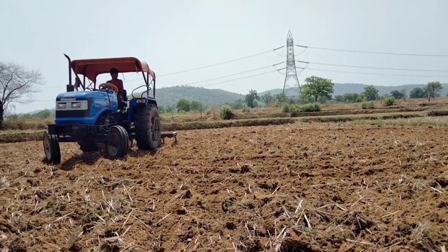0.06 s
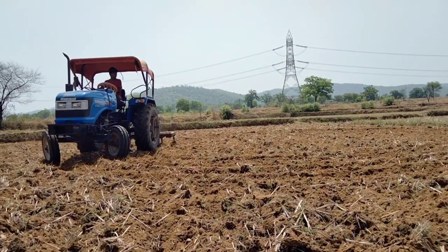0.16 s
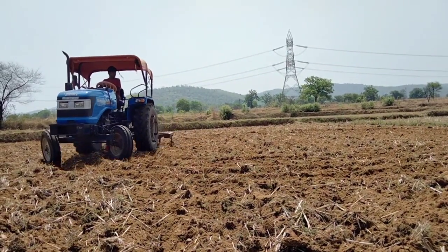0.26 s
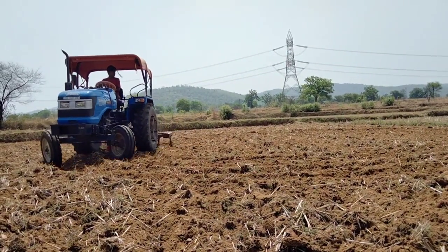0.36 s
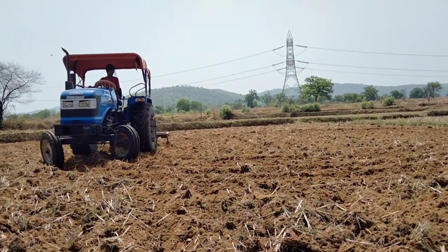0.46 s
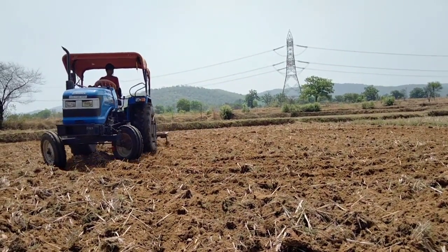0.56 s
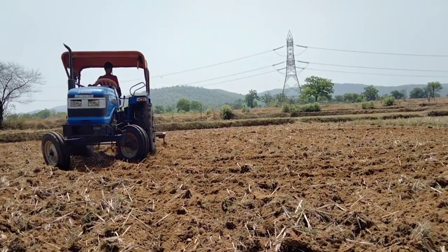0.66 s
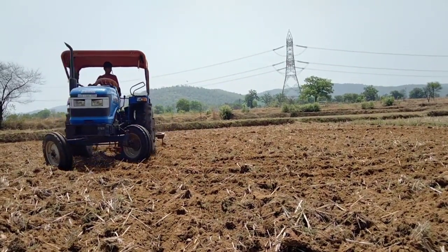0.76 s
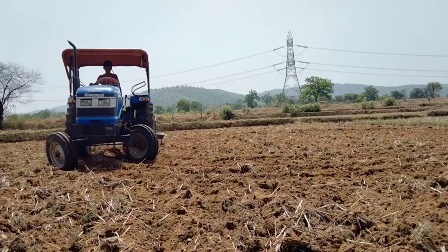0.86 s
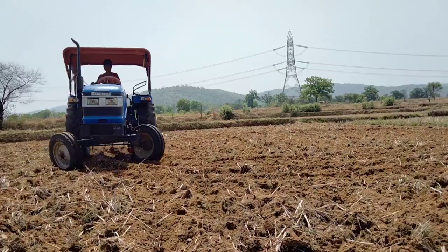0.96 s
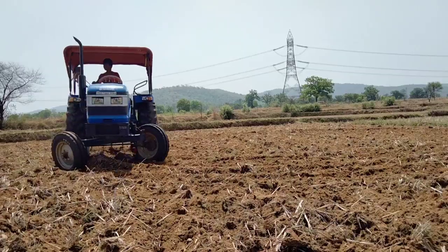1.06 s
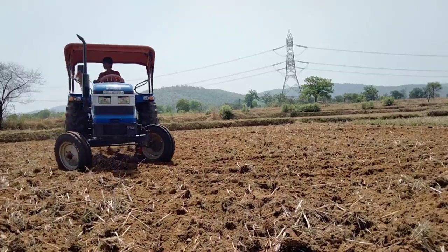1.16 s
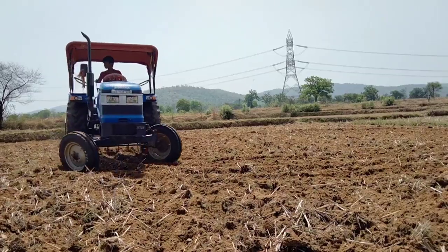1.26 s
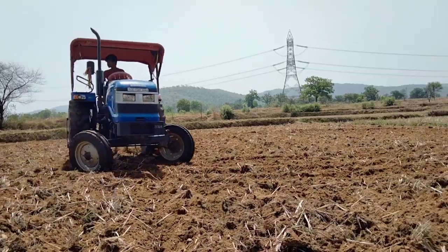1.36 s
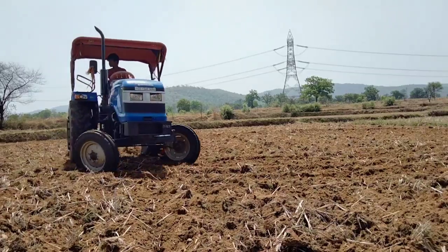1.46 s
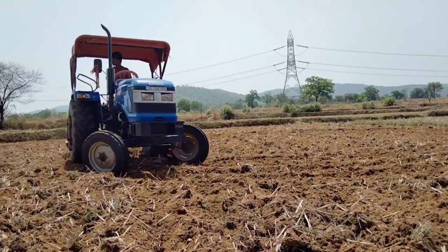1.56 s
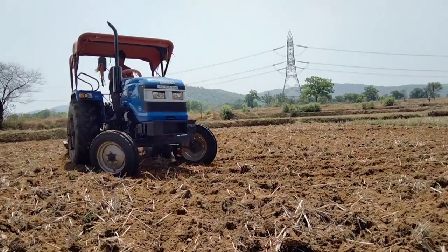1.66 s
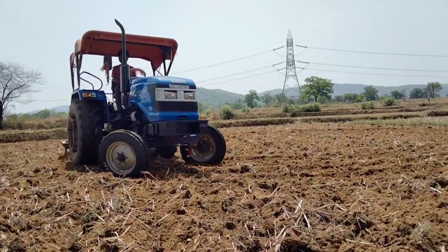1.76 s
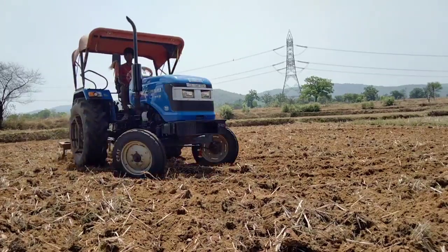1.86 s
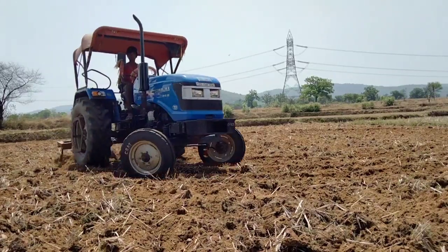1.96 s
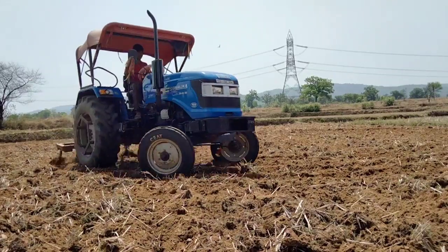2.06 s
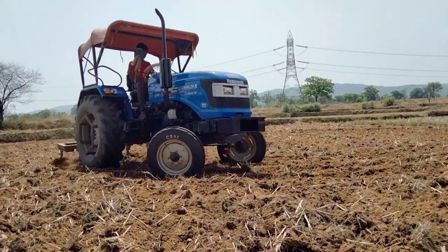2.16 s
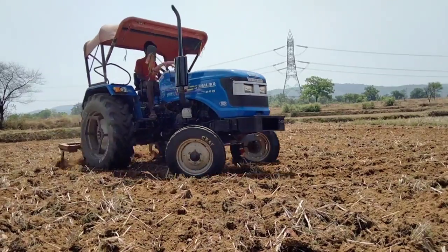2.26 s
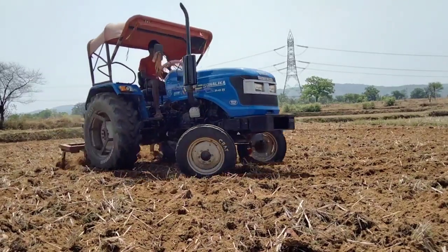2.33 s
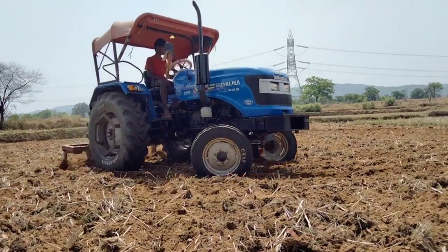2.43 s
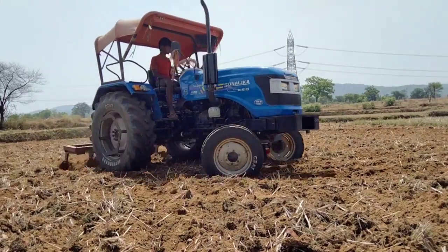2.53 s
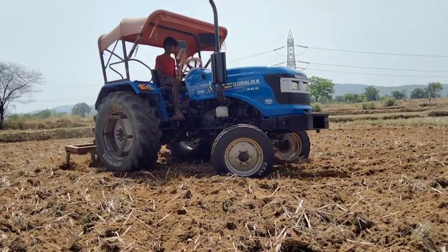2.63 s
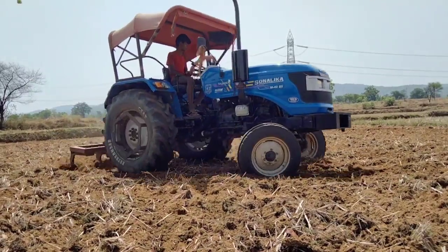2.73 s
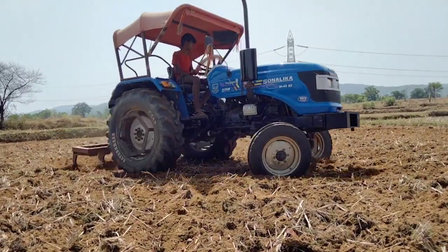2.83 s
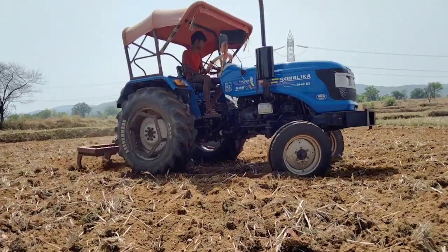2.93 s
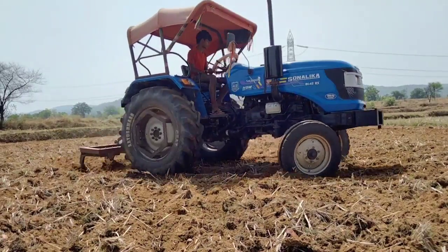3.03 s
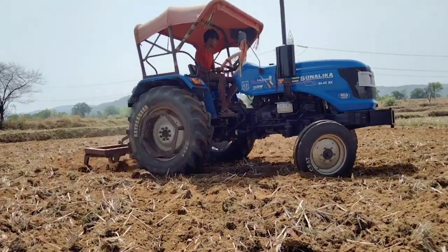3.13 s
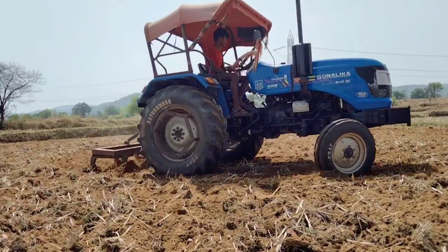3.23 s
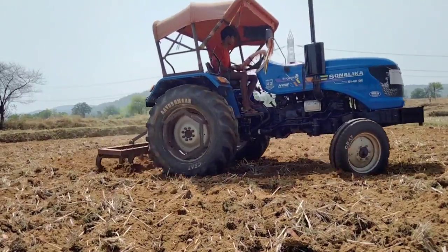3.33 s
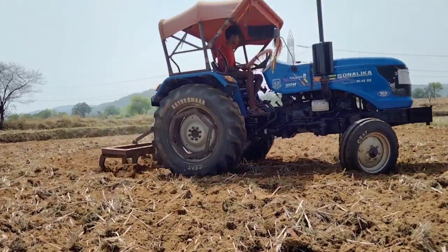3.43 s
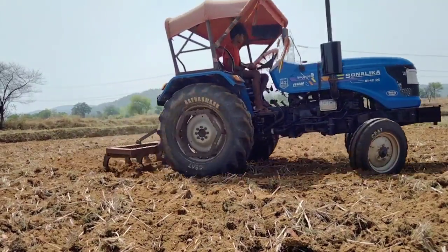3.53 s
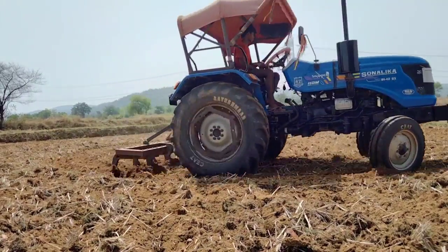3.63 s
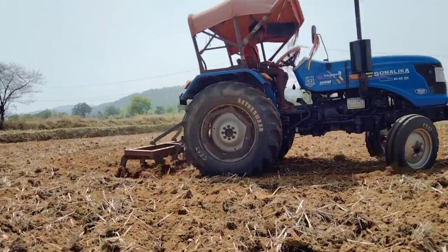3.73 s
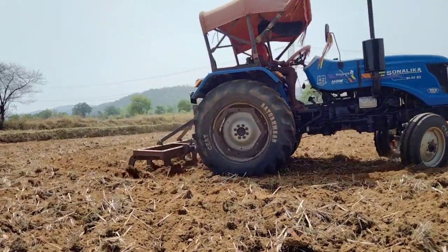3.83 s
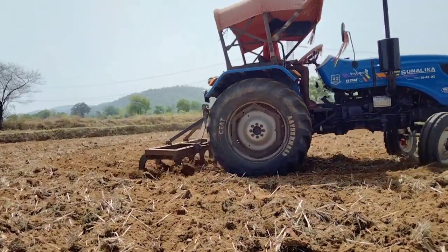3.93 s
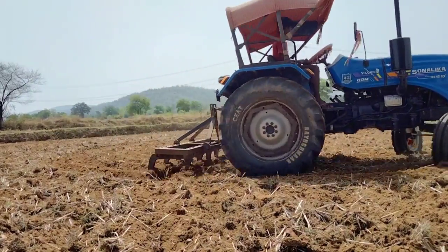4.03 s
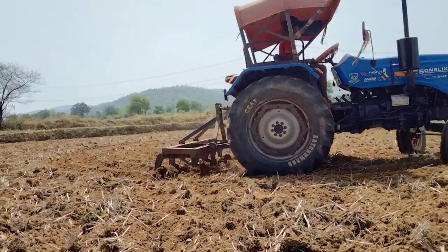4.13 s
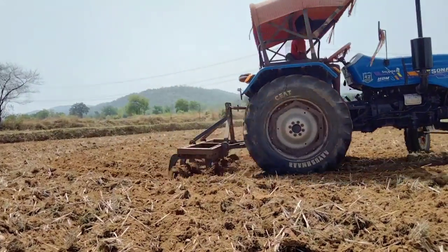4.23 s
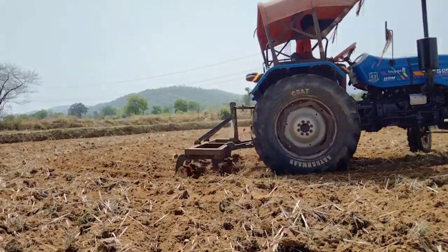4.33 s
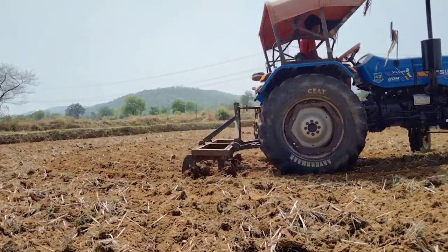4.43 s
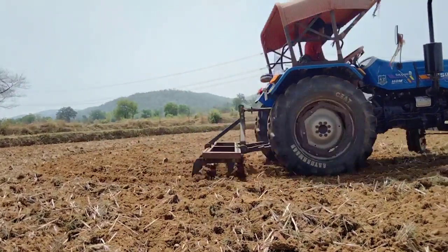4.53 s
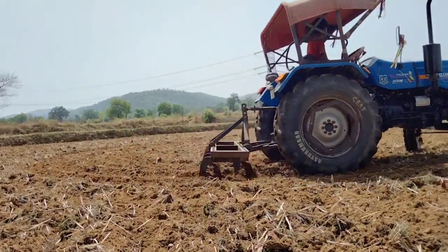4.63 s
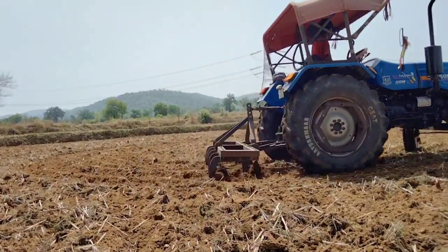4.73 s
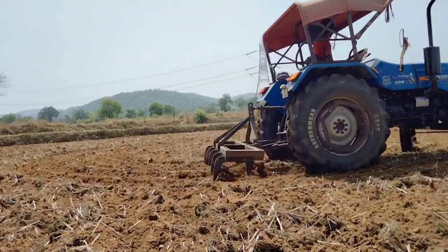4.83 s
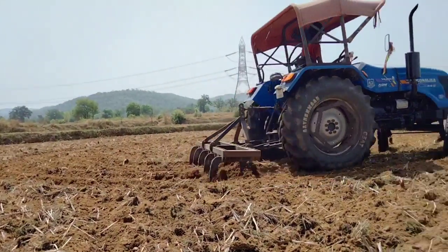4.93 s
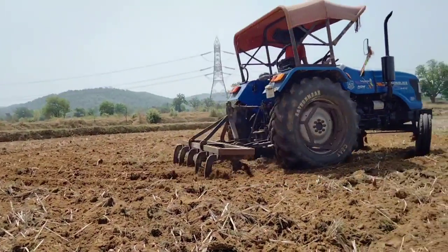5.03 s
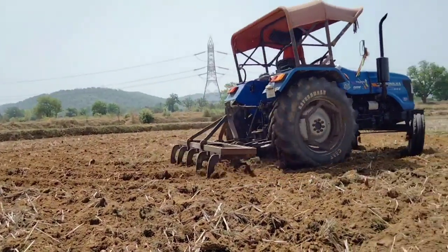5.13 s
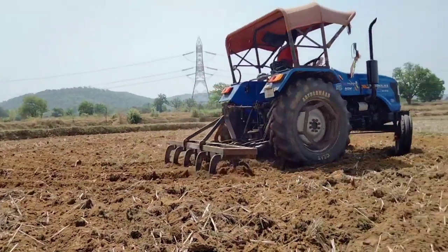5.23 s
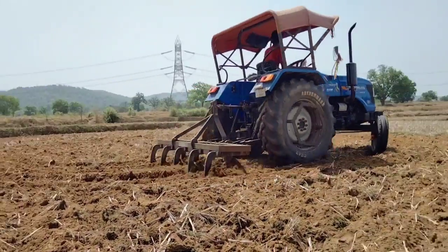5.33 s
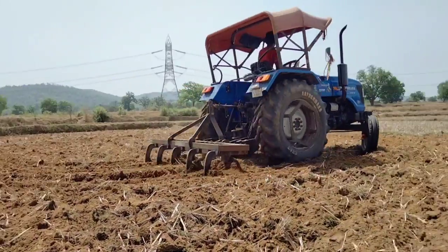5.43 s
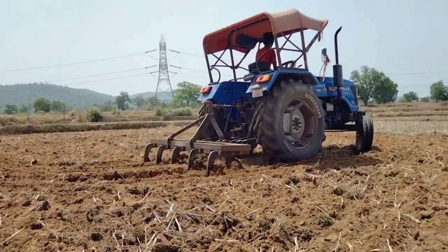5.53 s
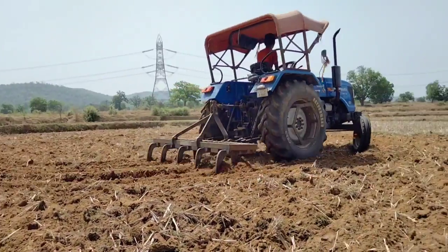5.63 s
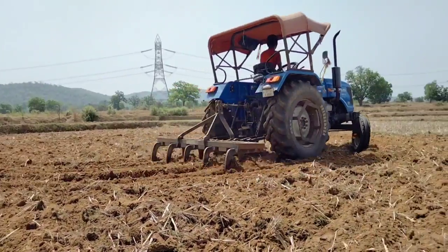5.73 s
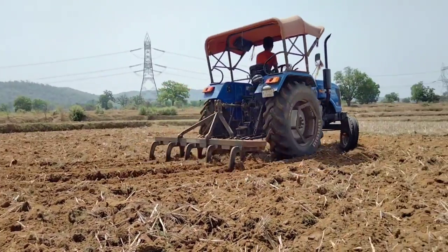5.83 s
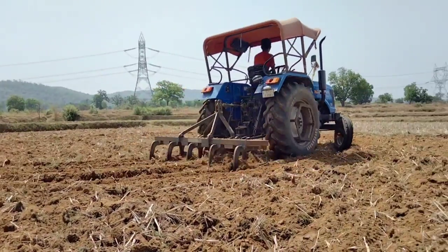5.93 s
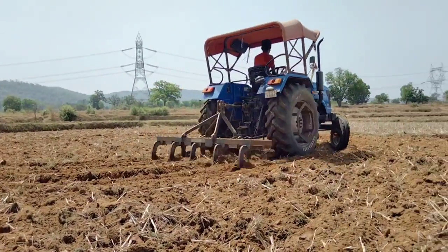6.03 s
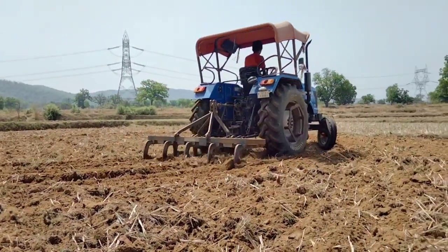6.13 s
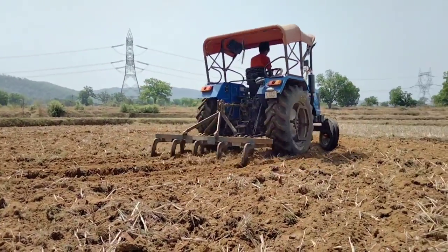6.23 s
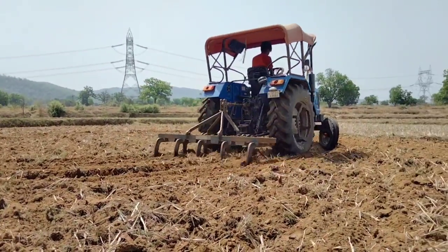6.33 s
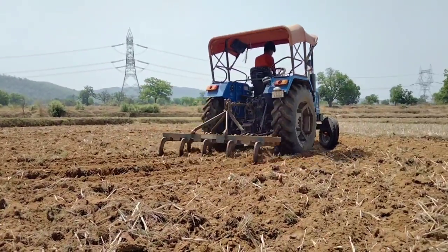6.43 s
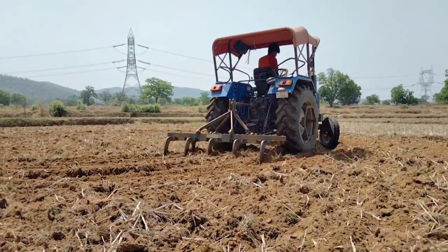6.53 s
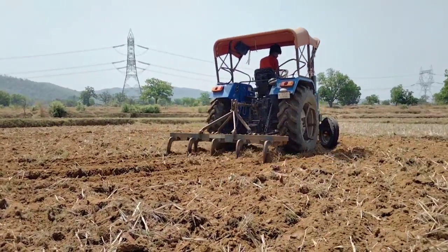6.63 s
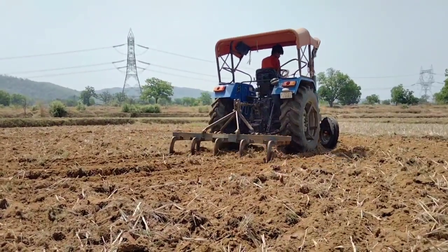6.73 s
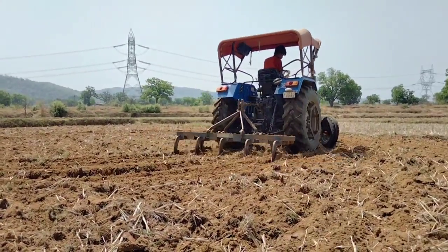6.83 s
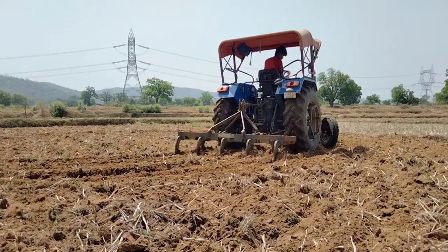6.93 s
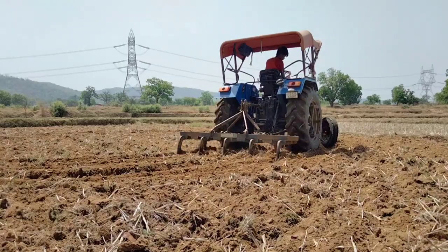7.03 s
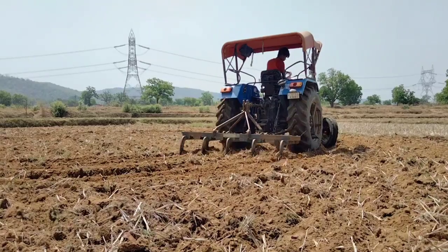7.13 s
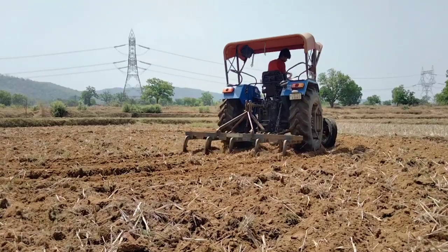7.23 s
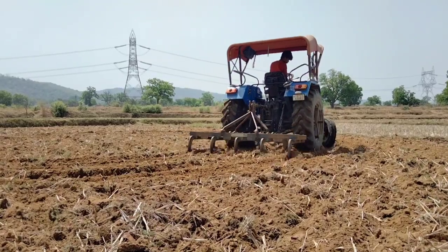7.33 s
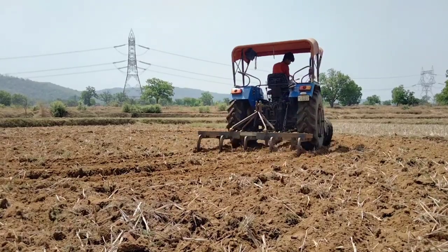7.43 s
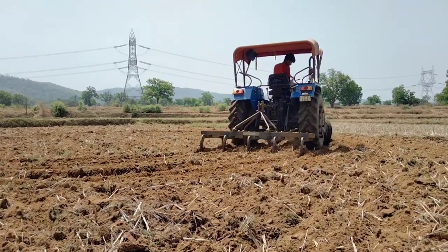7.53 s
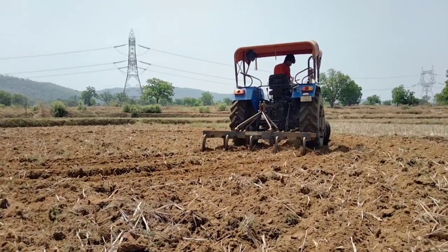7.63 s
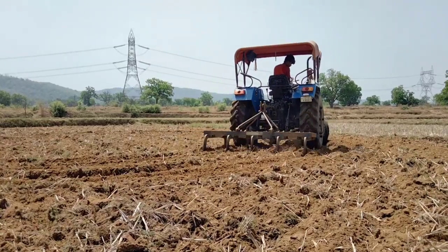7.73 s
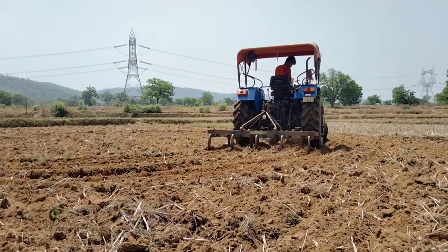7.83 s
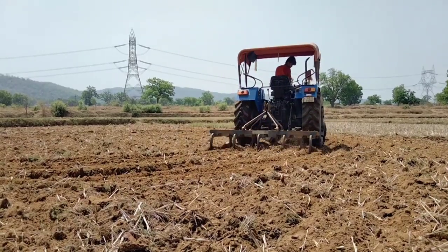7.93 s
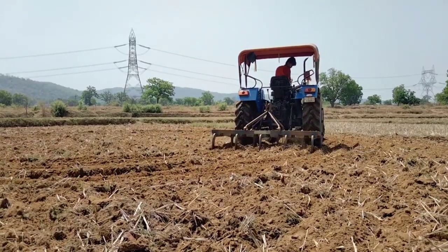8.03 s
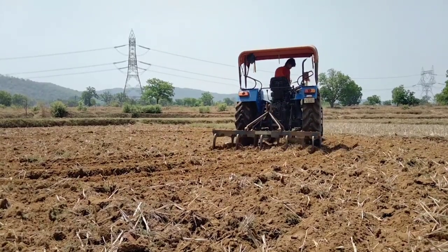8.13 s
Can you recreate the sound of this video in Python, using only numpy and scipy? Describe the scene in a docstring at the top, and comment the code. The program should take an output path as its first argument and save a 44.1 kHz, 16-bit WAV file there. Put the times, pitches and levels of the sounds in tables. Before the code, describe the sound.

Loaded three-cylinder tractor engine chugs at a constant fast pace, swelling with bright metallic knocking and hissing exhaust, then fading away behind.

```python
"""A three-cylinder diesel tractor turns toward the listener in a dry field, passes close and drives off.
Its exhaust thump is a sum of multiples of the firing rate; gas hisses from the pipe mouth as shaped noise.
Each firing rings modes of the engine block; the body roars as coloured noise, booming in panels and hollows.
Fan, pump and gears whine at whole multiples of the engine cycle, and tines of the dragged cultivator
strike three stones as decaying modes, all over a steady hiss."""
import sys
import numpy as np
from scipy import signal
from scipy.fft import rfft, irfft, next_fast_len
from scipy.io import wavfile
from scipy.ndimage import uniform_filter1d, map_coordinates

SR = 44100
rng = np.random.default_rng(int(sys.argv[2]) if len(sys.argv) > 2 else 0)


def persist_wave(psi):
    """Save psi, clipped to +-1, as 16-bit WAV."""
    counts = np.round(np.clip(psi, -1, 1) * 32767).astype(np.int16)
    wavfile.write(sys.argv[1], SR, np.atleast_2d(counts).T)


N = 360738


def amp(db):
    """Logarithmic level: decibels to amplitude gain."""
    return 10 ** (np.asarray(db) / 20)


def unit(x):
    """Normalisation to an rms of 1."""
    return x / np.sqrt(np.mean(x ** 2) + 1e-20)


def curves(rows):
    """Linear interpolation: one value per sample for each column after the time."""
    times, *columns = np.transpose(rows)
    t = np.arange(N) / SR
    return [np.interp(t, times, column) for column in columns]


def filtered(x, response):
    """Linear filtering: the spectrum of x times a response of frequency."""
    m = next_fast_len(N + SR // 2)
    return irfft(rfft(x, m) * response(np.fft.rfftfreq(m, 1 / SR)), m)[:N]


def resonance(f, centre, width):
    """Resonance curve with a peak of 1; the width is taken at half height."""
    return 1 / (1 + (2 * (f - centre) / width) ** 2)


def drift(step_s):
    """Slow random fluctuation: a smooth spline through a new value every step."""
    t = np.arange(N // 64 + 1) * 64 / SR
    knots = rng.standard_normal(int(N / SR / .04) + 4)
    return np.repeat(map_coordinates(knots, [t / max(step_s, .04)]), 64)[:N]


def wander(depth_db):
    """Amplitude modulation by a slow random gain, with a new value every 0.3 s."""
    return amp(depth_db * drift(.3))


# Firing rate of the engine: (time [s], rate [firings/s])
FIRING_RATE = [(0, 36.488), (1.3, 36.374), (2.1, 35.989), (3.5, 35.968), (5.2, 35.904), (8.18, 35.575)]


def firings():
    """Phase is the integral of rate: the count is whole where the exhaust valve opens."""
    return np.cumsum(curves(FIRING_RATE)[0]) / SR + .73


# Side of the tractor that is heard: (time [s], view [0 front, 1 side, 2 rear])
VIEW_IN_TIME = [(0, 0), (.9, 0.12), (1.6, .85), (2.5, 1.06), (3.4, 1.44), (4.3, 1.44), (5.2, 1.773),
                (6.5, 1.97), (8.18, 2.31)]


def view_now():
    """Directivity depends on angle: the view of the tractor at each sample."""
    return curves(VIEW_IN_TIME)[0]


def seen(rows):
    """Directivity: one value per sample for each column after the view, as the tractor turns."""
    views, *columns = np.transpose(rows)
    now = view_now()
    return [np.interp(now, views, column) for column in columns]


# Base levels through the pass: (time [s], exhaust thump [dB], body roar [dB], block knock [dB],
# exhaust jet [dB], crack at the start of each puff [dB])
PASS_LEVELS = [(0, -23.5, -31, -44, -33.5, -43), (.3, -23.5, -30, -39, -30.5, -42),
               (.55, -22, -29, -36.5, -28.5, -44), (.72, -23, -29, -36, -31.5, -45),
               (.9, -21, -28.5, -32.5, -29.5, -39), (1.03, -24, -28.5, -38, -33, -46),
               (1.2, -21.5, -28, -31, -28, -35), (1.6, -22, -27.5, -33, -26.5, -39),
               (1.8, -21.5, -26.5, -31.5, -25, -35), (2.2, -22, -26.5, -30.5, -26, -38),
               (2.55, -22, -27, -30, -25.5, -39), (2.72, -24, -26.5, -31.5, -27, -40),
               (3.15, -23.5, -29, -36, -25.5, -40), (3.6, -26, -29, -35, -27.5, -37),
               (3.75, -27.5, -30, -38.5, -31.5, -43), (3.97, -26.5, -31.5, -37, -26.5, -36),
               (4.15, -31, -32.5, -37.5, -33, -43), (4.35, -27.5, -32, -43, -30, -39),
               (4.52, -27.5, -34.5, -41.5, -32, -49), (4.7, -27.5, -33.5, -41, -32.5, -44),
               (5.05, -29.5, -33, -43, -36.5, -49), (5.25, -29, -34, -45.5, -38, -45),
               (5.7, -29.5, -35.5, -45.5, -40.5, -53), (6.5, -29.5, -37, -57, -43, -55),
               (7.2, -31.5, -38.5, -55, -45.5, -56), (8.18, -31.5, -39.5, -57, -44, -54)]


def pass_gains():
    """Level against time in the pass: gains of thump, roar, knock, jet and crack."""
    return amp(curves(PASS_LEVELS))


def sizes(scatter_db):
    """Cycle-to-cycle variation: a random gain held through each firing."""
    count = firings().astype(int)
    return amp(scatter_db * rng.standard_normal(count[-1] + 1))[count]


def puff(rise, hold, fall, rest_db):
    """Exponential rise and decay once a firing (times as shares of it), on a constant rest level."""
    u = firings() % 1
    attack = 1 - np.exp(-u / rise)
    decay = np.exp(-np.maximum(u - hold, 0) / fall)
    return attack * decay + amp(rest_db)


def rush(spectrum, patchy_db, repeat=0, patch=(4, 16)):
    """Broadband noise of rms 1, coloured and patchy (bins by frames); a share repeats every engine cycle."""
    f, db = np.transpose([(1, -120)] + list(spectrum) + [(SR / 2, -120)])
    cycle = rng.standard_normal(SR // 12)
    repeated = cycle[(firings() / 3 % 1 * len(cycle)).astype(int)]
    share = np.clip(repeat, 0, 1)
    source = np.sqrt(1 - share) * rng.standard_normal(N) + np.sqrt(share) * repeated
    z = signal.stft(source, nperseg=1024)[2]
    field = uniform_filter1d(rng.standard_normal(z.shape), size=patch[0], axis=0)
    field = uniform_filter1d(field, size=patch[1], axis=1)
    noise = signal.istft(z * amp(patchy_db * unit(field)), nperseg=1024)[1][:N]
    return unit(filtered(noise, lambda hz: amp(np.interp(np.log(hz + 1), np.log(f + 1), db))))


def strike(times, levels_db, modes, spread, rough, scatter_db, snap_db):
    """Modal impact: each blow snaps and rings modes of varied strength and pitch; chatter roughens the ring."""
    out = np.zeros(N + SR)
    t = np.arange(SR // 30) / SR  # each blow is cut off after 1/30 s
    hz, db, t60 = np.transpose(modes)[:, :, None]
    luck = rng.standard_normal((len(times), 3, len(modes), 1))
    for s, level, (strength, detune, phase) in zip(times, levels_db, luck):
        decay = amp(db + scatter_db * strength - 60 * t / t60)
        ring = decay * np.sin(2 * np.pi * hz * (1 + spread * detune) * t + 9 * phase)
        grit = rng.standard_normal((2, len(t)))
        chatter = 1 + rough * unit(uniform_filter1d(grit[0], size=30))
        click = uniform_filter1d(grit[1], size=4) - uniform_filter1d(grit[1], size=12)
        snap = amp(snap_db - 60 * t / 0.0069) * click  # falls 60 dB in 6.9 ms
        blow = ring.sum(axis=0) * chatter * (1 - np.exp(-t / 0.0017)) + snap
        out[round(s * SR):][:len(t)] += amp(level) * blow / np.linalg.norm(amp(db))
    return out[:N]


# Colour of the far hiss of field and microphone: (frequency [Hz], relative density [dB per Hz])
AIR_SPECTRUM = [(2000, -20), (5000, -9), (9000, 10), (12000, -1), (15500, -7)]


def air():
    """Stationary background noise: a steady coloured hiss."""
    return amp(-49.0) * rush(AIR_SPECTRUM, patchy_db=1)


# Tine strikes on stones: (time [s], level [dB])
STONE_STRIKES = [(6.7983, -32), (7.0359, -44), (8.1267, -26)]
# Modes of a steel tine: (frequency [Hz], relative level [dB], 60 dB decay time [s])
TINE_MODES = [(880, -5, 0.065), (1227, 2, .07), (1490, -2, .07), (1890, -1, .06), (2350, 3, 0.064),
              (2760, -10, .06), (3300, -12, .07), (3470, -1, 0.13), (3800, 0, .06), (4370, -5, .05),
              (5200, -5, .04), (5560, -6, 0.026), (6560, -1, .03)]


def tines():
    """Modal vibration after impact: steel tines clank on stones."""
    times, levels_db = np.transpose(STONE_STRIKES)
    return strike(times, levels_db, TINE_MODES, spread=0.029, rough=0.97, scatter_db=1, snap_db=0)


# Resonances of two hollows in the bodywork, a list for each: (frequency [Hz], width [Hz])
HOLLOW_PEAKS = [
    [(818, 47), (865, 31)],
    [(1090, 88)],
]
# Angles where a hollow faces the listener:
# (hollow [index], view [0 front - 2 rear], half-width [view], level over the roar [dB])
HOLLOW_OPENINGS = [(0, 0.044, 0.11, -7), (0, 1.28, 0.04, -13), (0, 1.87, 0.078, -6), (1, 0.37, 0.12, -9.5),
                   (1, .97, .05, -8.5), (1, 1.3, 0.045, -9), (1, 2, 0.063, -2.5)]


def hollows():
    """Cavity resonance with directivity: noise booms in hollows that face the listener at some angles."""
    out, view = 0, view_now()
    for k, peaks in enumerate(HOLLOW_PEAKS):
        tuned = lambda f: sum(resonance(f, hz, width) for hz, width in peaks)
        facing = sum(amp(db) / (1 + ((view - at) / width) ** 2)
                     for which, at, width, db in HOLLOW_OPENINGS if round(which) == k)
        out = out + facing * unit(filtered(rng.standard_normal(N), tuned))
    _, roar_gain, *_ = pass_gains()
    return roar_gain * out


# Blade or tooth passes in one engine cycle of three firings: one [count] per tone
PASSES_PER_CYCLE = [20, 40, 46, 150, 180]
# Shaft-driven tones of fan, pump and gears: (view [0 front - 2 rear], base level of each tone
# over the roar [dB], five columns)
WHINE_LEVELS = [(0, -21, -17, -14, -14, -27), (.2, -14, -18, -21, -22, -26),
                (.8, -15, -10.5, -13, -16, -14), (.97, -13, -10.5, -23, -15, -23),
                (1.15, -11, -14, -17, -20, -17), (1.35, -8.5, -10, -7, -22, -18.5),
                (1.5, -8, -25, -35, -9.5, -17), (1.7, -14, -15, -11, -19, -22),
                (1.85, -12, -6.5, -16, -19, -19), (1.929, -11, -7.5, -16, -15, -17),
                (2.001, -6.5, -8.5, -17, -29, -20)]


def whine():
    """Blade and tooth passing tones: whole multiples of the engine cycle, with a slight phase ripple."""
    smooth = uniform_filter1d(rng.standard_normal(N), size=3000)
    ripple = unit(uniform_filter1d(smooth, size=3000))
    turn = 2 * np.pi * firings() / 3 + .005 * ripple  # radians
    # each tone swells and fades slowly at random, on its own
    tones = sum(amp(db) * wander(0.5) * np.sin(passes * turn)
                for passes, db in zip(PASSES_PER_CYCLE, seen(WHINE_LEVELS)))
    _, roar_gain, *_ = pass_gains()
    return roar_gain * tones


# Colour of the roar from each view, before the panels: (frequency [Hz], relative density [dB per Hz])
FRONT_SPECTRUM = [(30, -12), (60, -18), (120, -9.5), (200, -20), (270, -24.5), (420, -23), (500, -19),
                  (700, -21.5), (1000, -25), (1300, -16.5), (1930, -24.5), (3300, -25), (5370, -44.5),
                  (6500, -26.5)]
SIDE_SPECTRUM = [(30, -9), (60, -16), (120, -3.5), (200, -9), (270, -18.5), (420, -15.5), (500, -11),
                 (700, -13.5), (1000, -16), (1400, -16), (1700, -16), (2490, -17), (3290, -19), (6500, -43)]
REAR_SPECTRUM = [(30, -22), (60, -24.5), (120, -12), (200, -18.5), (270, -25.5), (430, -27.5), (500, -22),
                 (700, -24), (1000, -24), (1300, -27), (1650, -25.5), (1800, -27.5), (4070, -35),
                 (6500, -43)]
# Panels that boom in the roar:
# (frequency [Hz], width [Hz], gain from the front [dB], from the side [dB], from the rear [dB])
PANEL_MODES = [(512, 460, 4, 1.33, 2.2), (830, 240, 5, 0.33, 2.7), (1045, 340, 4.5, 6.2, 2.9),
               (1200, 60, 3, 0.69, 1.2), (1418, 127, -7.5, 10, 4.2), (1567, 113, 6, 1.7, 7.2),
               (1836, 64, 4.5, 4.3, 1), (2140, 150, 6.5, 1.3, 2.4), (2436, 52, 7, 7, 0.54)]


def body():
    """Directional radiation and panel resonance: the roar turns with the tractor and swells every firing."""
    view, roar = np.clip(view_now(), 0, 2), 0
    for k, spectrum in enumerate((FRONT_SPECTRUM, SIDE_SPECTRUM, REAR_SPECTRUM)):
        boom = lambda f: 1 + sum((amp(db[k]) - 1) * resonance(f, c, w) for c, w, *db in PANEL_MODES)
        side = filtered(rush(spectrum, patchy_db=1.4, repeat=0.4), boom)
        middle = np.std(filtered(side, lambda hz: (hz > 300) & (hz < 3000)))  # sets the level of each view
        share = np.clip(1 - abs(view - k), 0, 1)  # crossfade by power
        roar = roar + np.sqrt(share) * side / middle
    swell = puff(0.15, 0.51, 1.0, rest_db=1.0) * uniform_filter1d(sizes(0.61), size=300)
    _, roar_gain, *_ = pass_gains()
    return roar_gain * roar * unit(swell)


# Modes of the iron block: (frequency [Hz], relative level [dB], 60 dB decay time [s])
BLOCK_MODES = [(2606, -8.5, 0.066), (3622, -8, 0.075), (3906, -0.5, 0.033), (4063, 3.5, 0.019),
               (4557, -3, 0.029), (4850, -6, 0.019), (5500, -7, 0.018), (5660, -33, .012),
               (5850, -12, .012)]
# Relative knock of each cylinder: one [dB] per cylinder
CYLINDER_KNOCKS = [0.17, 0.23, 1.85]
# The hardest firings: (time [s], level [dB])
HARD_KNOCKS = [(1.054, -16), (1.193, -16), (1.3009, -11.5), (1.4386, -14), (1.548, -14), (1.7713, -12),
               (1.8532, -17), (1.88, -17), (1.936, -19), (1.9639, -16), (2.0184, -16), (2.1034, -11),
               (2.1869, -18), (2.2129, -10), (2.2703, -29), (2.4359, -15.5), (2.5197, -7), (2.604, -16),
               (2.742, -12), (2.797, -14), (2.8523, -17), (2.9367, -16), (2.9643, -13.5), (3.048, -13),
               (3.0764, -25), (3.1033, -13), (3.132, -13), (3.1862, -14), (3.353, -19), (3.6884, -13),
               (3.9394, -19)]
# Colour of the valve clatter: (frequency [Hz], relative density [dB per Hz])
CLATTER_SPECTRUM = [(1500, -40), (2100, -37), (2550, -8), (2750, -42), (3300, -2), (3700, -9.5), (4700, 8),
                    (5200, 1), (6300, -2), (7200, -15), (9000, -39)]
# Valve clatter against angle: (view [0 front - 2 rear], level over the knock [dB])
CLATTER_LEVELS = [(0, -7.5), (.3, -5.5), (.8, -3), (1, -4), (1.3, -7.5), (1.6, -10.5), (1.85, -7), (2, -5)]


def knock():
    """Impact excitation of modes: each firing rings the block and snaps the valve gear; some land harder."""
    count = (firings() + .88).astype(int)  # the blow lands a little after the valve opens
    at = np.flatnonzero(np.diff(count))
    levels_db = np.resize(CYLINDER_KNOCKS, count[-1] + 1) + 0.33 * rng.standard_normal(count[-1] + 1)
    blows = strike(at / SR, levels_db[count[at + 1]], BLOCK_MODES,
                   spread=0.012, rough=0.39, scatter_db=3, snap_db=-4)
    later = at / SR + rng.uniform(0.0056, .02, len(at))  # tappets tick between the blows
    ticks_db = rng.normal(-8, 3, len(at))
    ticks = strike(later, ticks_db, BLOCK_MODES, spread=0.0406, rough=0.42, scatter_db=8.0, snap_db=5)
    times, hard_db = np.transpose(HARD_KNOCKS)
    hard = strike(times, hard_db, BLOCK_MODES, spread=0.023, rough=0.4, scatter_db=1.5, snap_db=10)
    bursts = puff(0.019, 0.18, 0.31, rest_db=-25) * amp(levels_db[count])
    clatter = rush(CLATTER_SPECTRUM, patchy_db=2) * unit(bursts)
    _, _, knock_gain, *_ = pass_gains()
    return knock_gain * (unit(blows + ticks) + amp(seen(CLATTER_LEVELS)[0]) * clatter) + hard


# Colour of the gas jet: (frequency [Hz], relative density [dB per Hz])
JET_SPECTRUM = [(2650, -2.5), (4500, -9.5), (5490, -11.5), (6870, -8.5), (7710, 1), (9110, 5.5),
                (9760, 1.5), (12000, -13.5), (14900, -18), (15700, -23)]
# Colour of the crack that starts each puff: (frequency [Hz], relative density [dB per Hz])
CRACK_SPECTRUM = [(9000, -36), (11500, -3.5), (13000, -2), (15500, 3), (16000, -5)]
# Relative exhaust puff of each cylinder: one [dB] per cylinder
CYLINDER_PUFFS = [0.37, -0.23, 0.37]


def jet():
    """Turbulent jet noise: gas hisses from the pipe mouth in puffs, brightest at first; eddies shift its colour."""
    eddy = (14, 4)  # frequency bins by frames
    cylinder = firings().astype(int) % len(CYLINDER_PUFFS)
    strength = sizes(0.97) * amp(CYLINDER_PUFFS)[cylinder]
    hiss_puffs = puff(0.042, 0.4, 0.11, rest_db=-8.5) * strength
    crack_puffs = puff(.03, 0.2, .2, rest_db=-17) * strength * sizes(0.92)
    hiss = rush(JET_SPECTRUM, patchy_db=1.5, patch=eddy) * unit(hiss_puffs)
    crack = rush(CRACK_SPECTRUM, patchy_db=2.0, patch=eddy) * unit(crack_puffs)
    *_, hiss_gain, crack_gain = pass_gains()
    return hiss_gain * hiss + crack_gain * crack


# Multiples of the firing rate against angle: (view [0 front - 2 rear], base level over the thump of
# multiples 1 to 5 [dB], five columns)
THUMP_LEVELS = [(0, -7, -1.5, -5.1, -21.5, -22), (.3, -8, -2, -3.5, -19, -29),
                (.8, -12.1, -2.6, -6, -20, -21.5), (.95, -14, -3, -6, -26, -13),
                (1.1, -11, -2, -4.5, -16, -20), (1.3, -10, -2.5, -3, -14, -20),
                (1.5, -10, -1.5, -3.5, -19, -27), (1.75, -7, -1, -4.5, -20, -26),
                (1.93, -9.5, -3, -3.5, -18.5, -29), (2, -8.5, -3, -4.5, -14, -24)]


def exhaust():
    """Fourier synthesis: multiples of the firing rate sum to a lopsided thump; unequal cylinders swing its size."""
    turn = 2 * np.pi * (firings() - .23)
    turn = turn + 0.096 * uniform_filter1d(drift(.07), size=200)  # firings come a little early or late
    view = view_now()
    # phases in radians: a push, a pull, a rebound; the shape turns with the view
    lean = [.2 + .8 * view, .65, .3 * view, 1.5 * view - 1.2, 1 + drift(.4)]
    waver_db = [1.1, .3, .6, 2.5, 2.5]  # the weaker multiples waver more
    thump = 0
    for k, db in enumerate(seen(THUMP_LEVELS)):
        wave = np.cos((k + 1) * turn + lean[k])
        thump = thump + np.sqrt(2) * amp(db) * wander(waver_db[k]) * wave
    thump = thump + amp(-24) * wander(2.5) * np.cos(4 * turn / 3)  # a weak tone between the lowest two
    uneven = 1 + 0.16 * np.cos(turn / 3 + 2.8) + .04 * np.cos(2 * turn / 3)
    thump_gain, *_ = pass_gains()
    return thump_gain * thump * uneven * uniform_filter1d(sizes(0.46), size=600)


def scene():
    """Superposition: all sources in the open field add to the steady hiss."""
    return (air() + tines() + hollows() + whine() + body() + knock() + jet() + exhaust())[None]


def record(dry):
    """Band limiting: the camera keeps nothing from 15650 Hz up."""
    return filtered(dry[0], lambda hz: hz < 15650)[None]


dry = scene()
out = record(dry)
persist_wave(out)
```